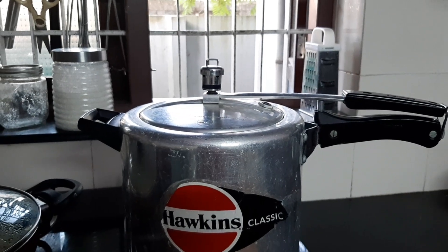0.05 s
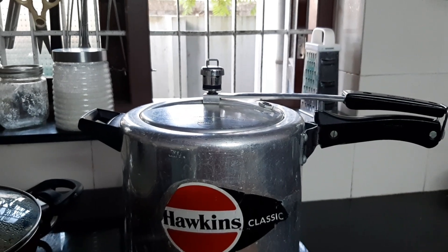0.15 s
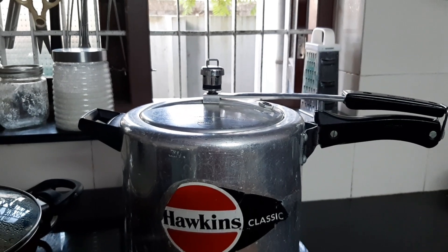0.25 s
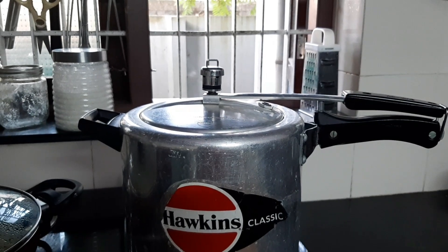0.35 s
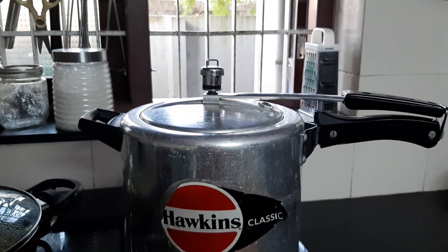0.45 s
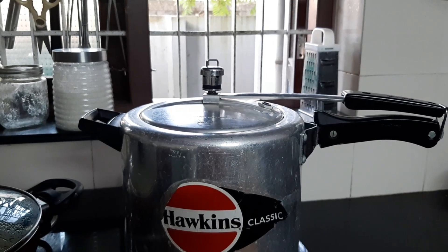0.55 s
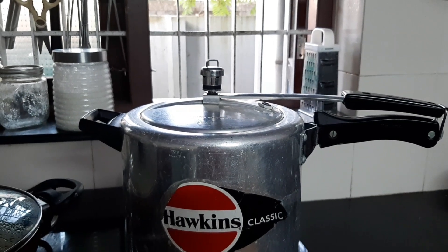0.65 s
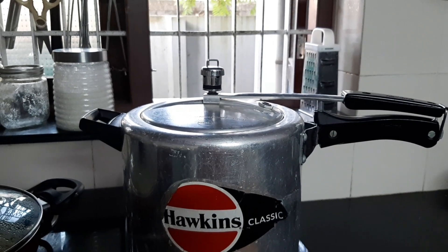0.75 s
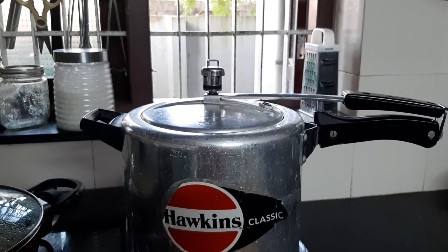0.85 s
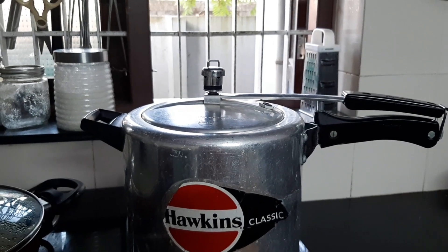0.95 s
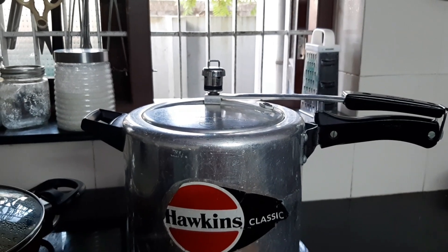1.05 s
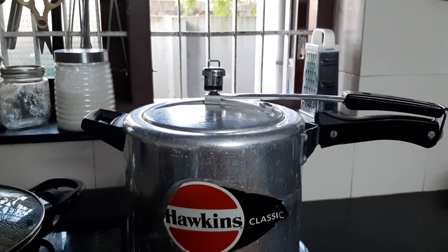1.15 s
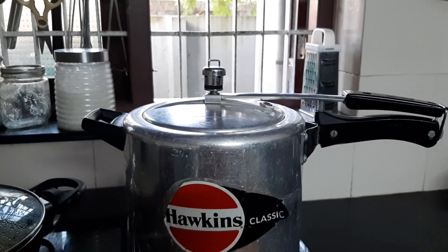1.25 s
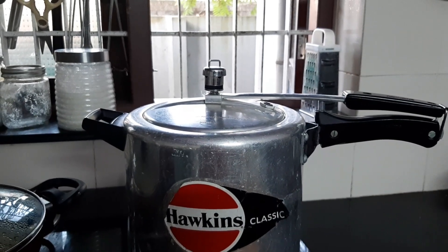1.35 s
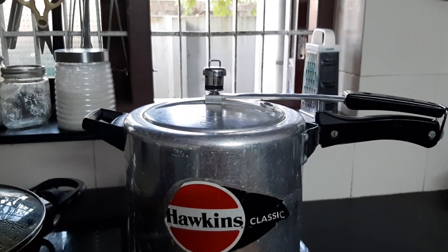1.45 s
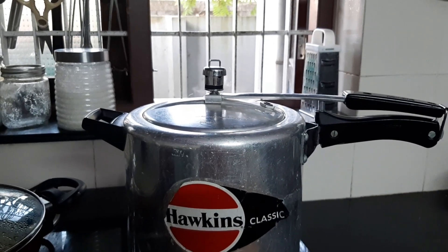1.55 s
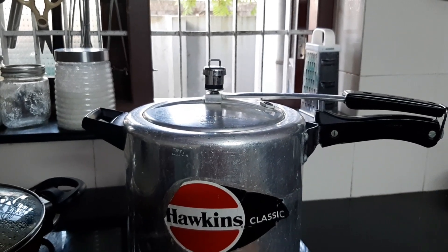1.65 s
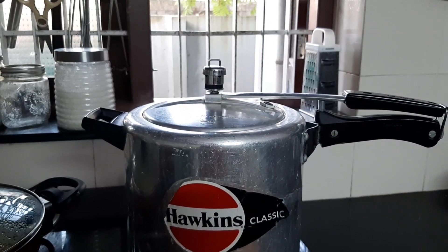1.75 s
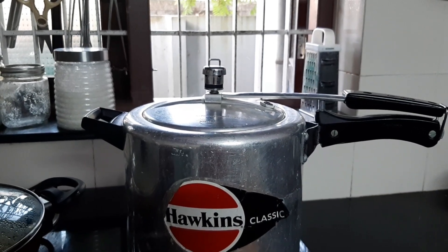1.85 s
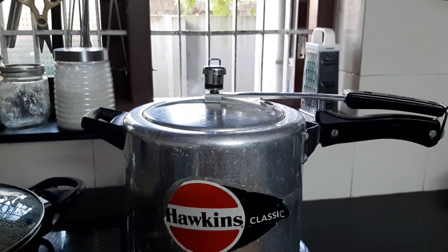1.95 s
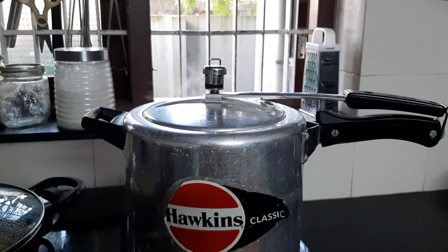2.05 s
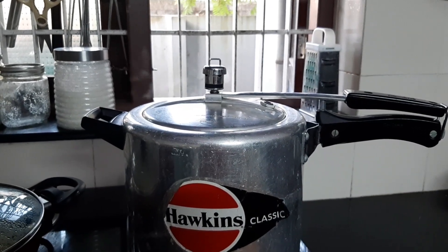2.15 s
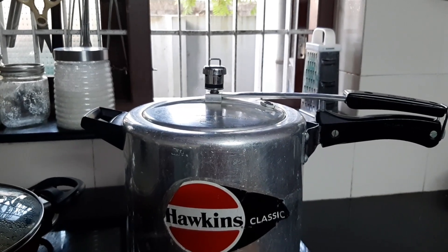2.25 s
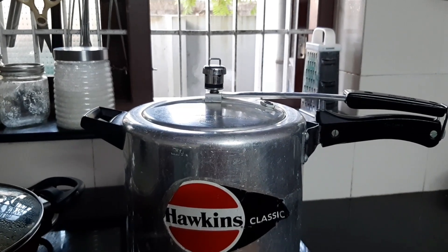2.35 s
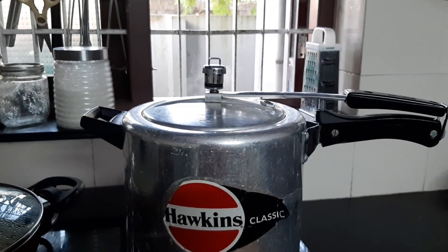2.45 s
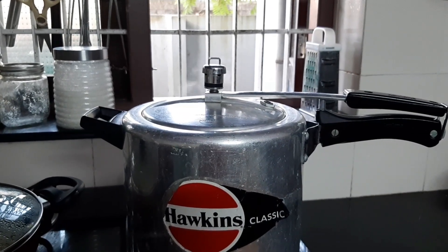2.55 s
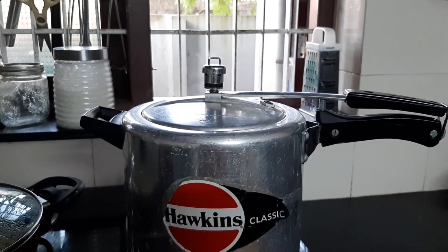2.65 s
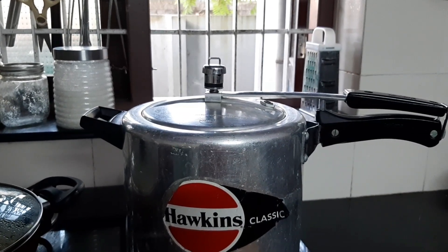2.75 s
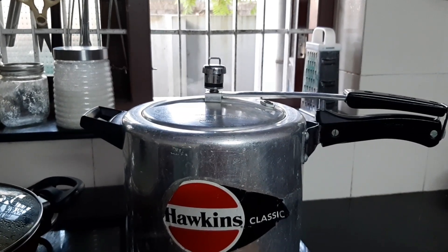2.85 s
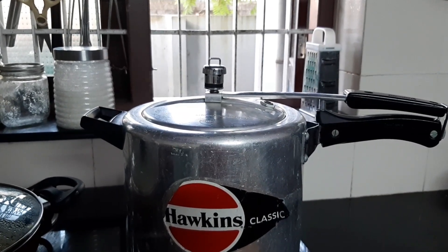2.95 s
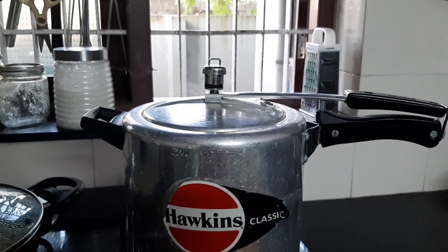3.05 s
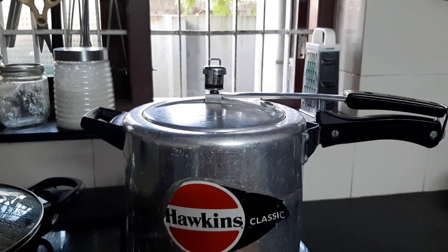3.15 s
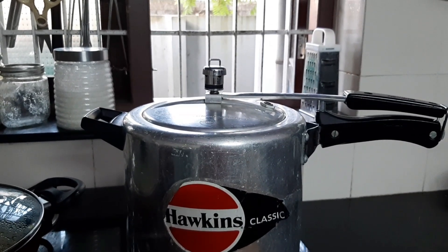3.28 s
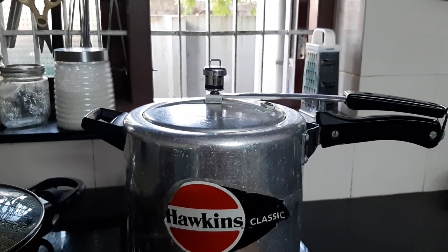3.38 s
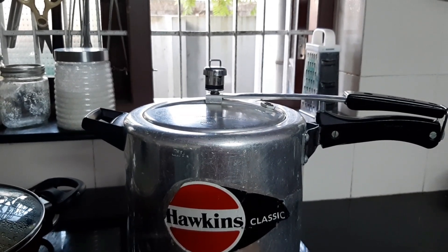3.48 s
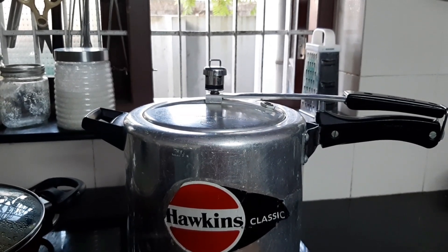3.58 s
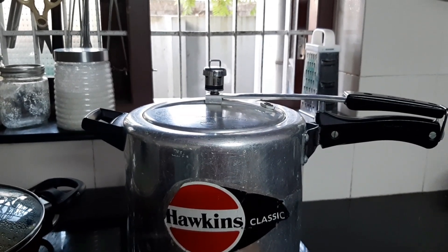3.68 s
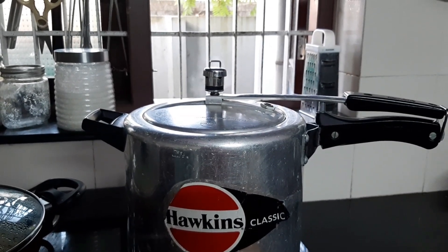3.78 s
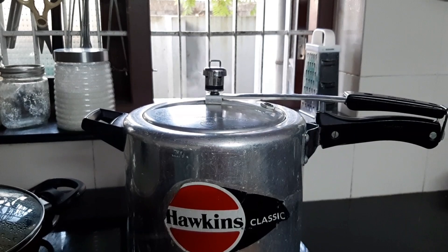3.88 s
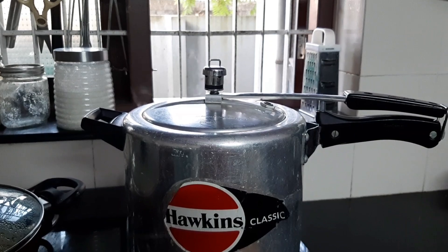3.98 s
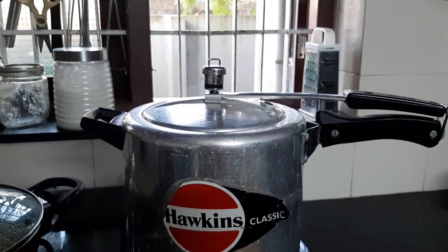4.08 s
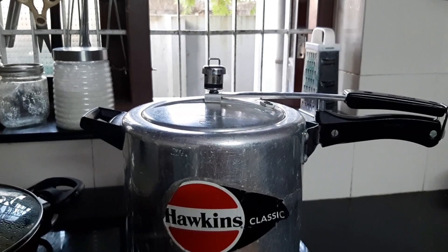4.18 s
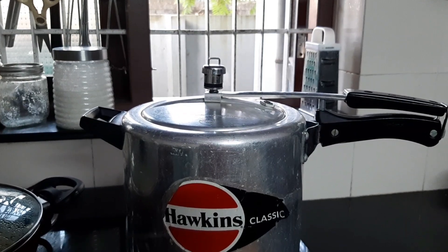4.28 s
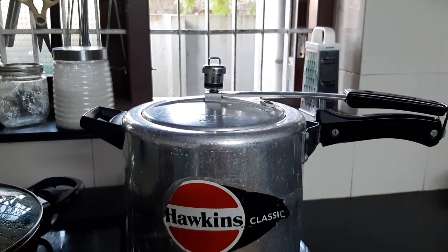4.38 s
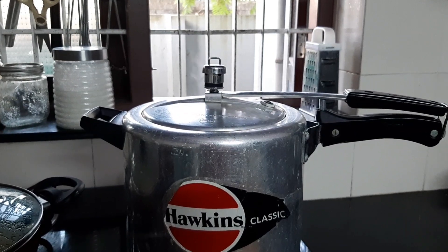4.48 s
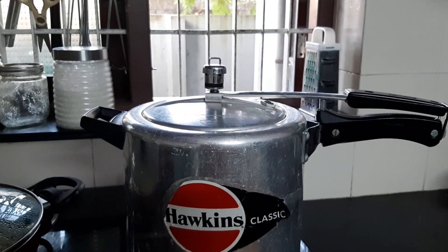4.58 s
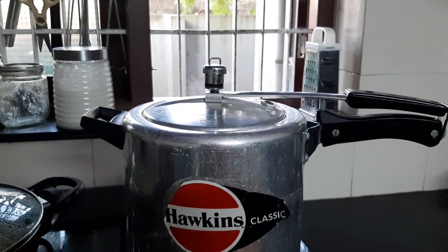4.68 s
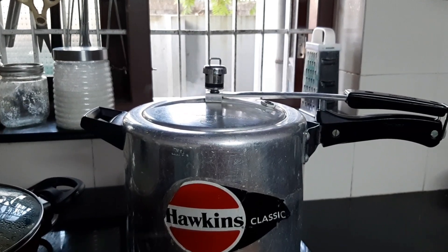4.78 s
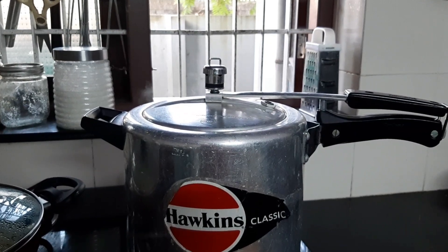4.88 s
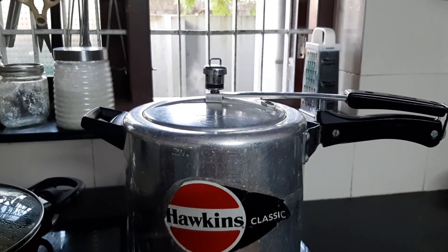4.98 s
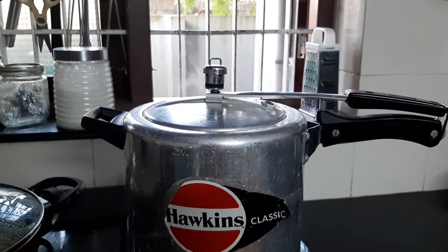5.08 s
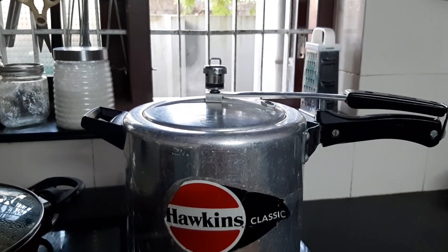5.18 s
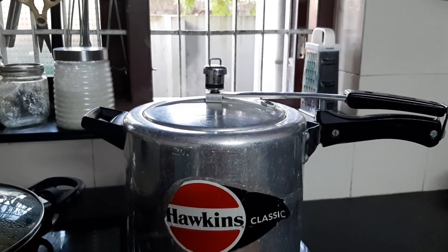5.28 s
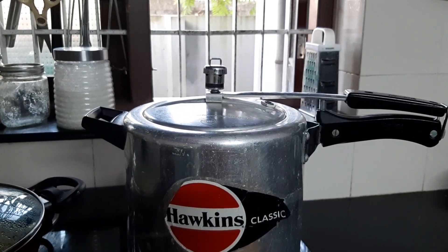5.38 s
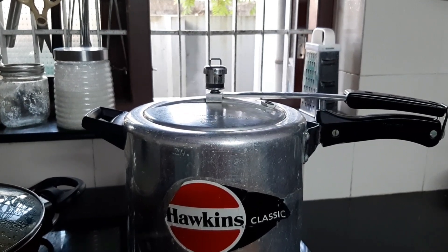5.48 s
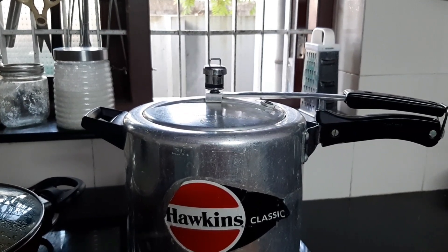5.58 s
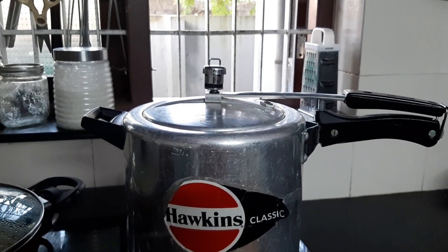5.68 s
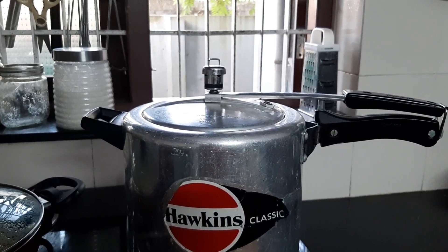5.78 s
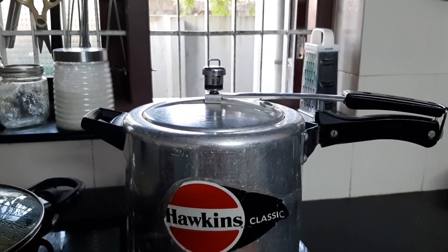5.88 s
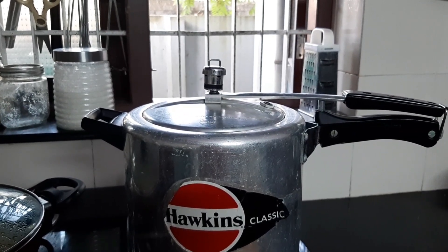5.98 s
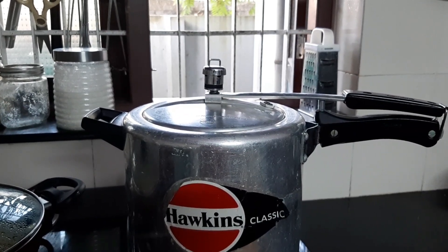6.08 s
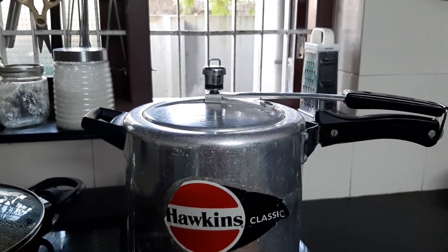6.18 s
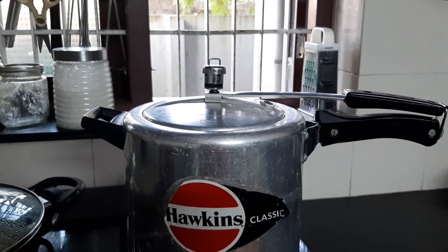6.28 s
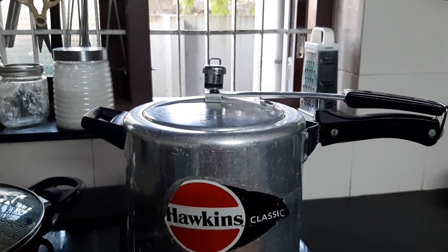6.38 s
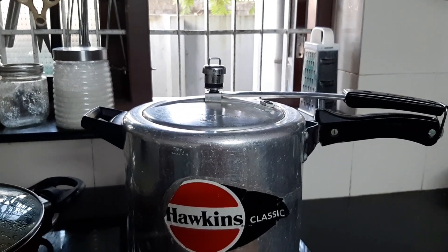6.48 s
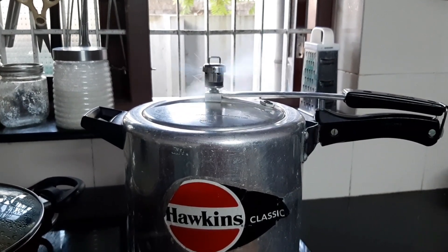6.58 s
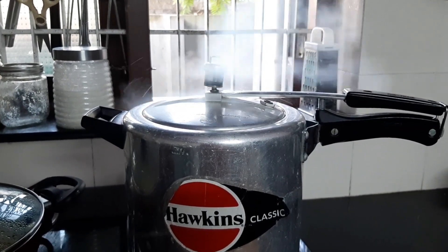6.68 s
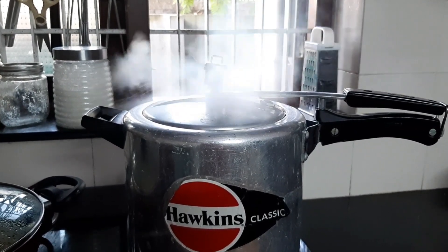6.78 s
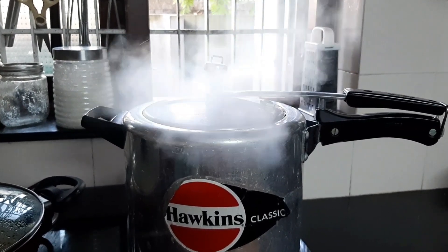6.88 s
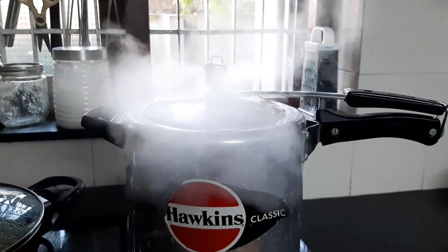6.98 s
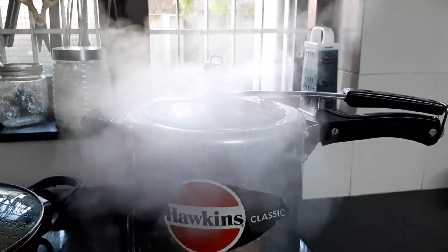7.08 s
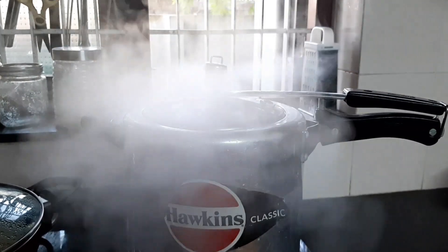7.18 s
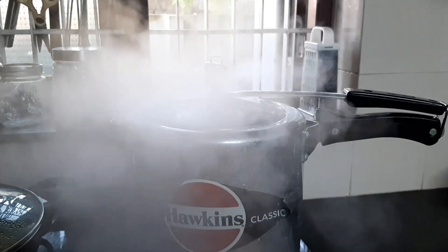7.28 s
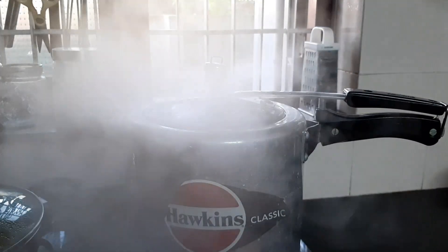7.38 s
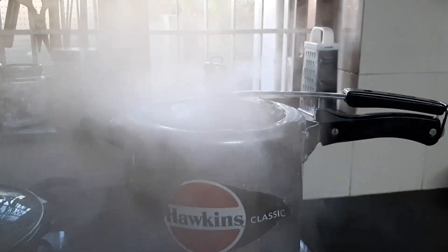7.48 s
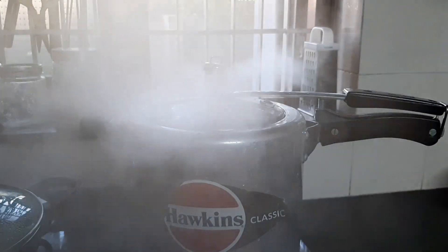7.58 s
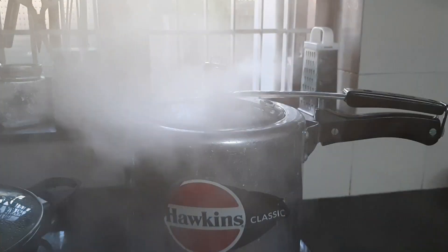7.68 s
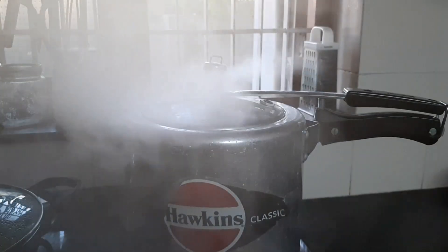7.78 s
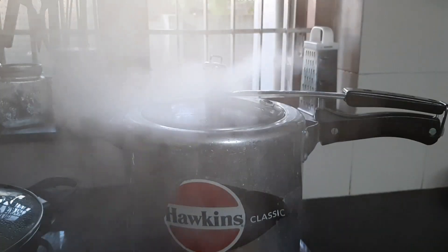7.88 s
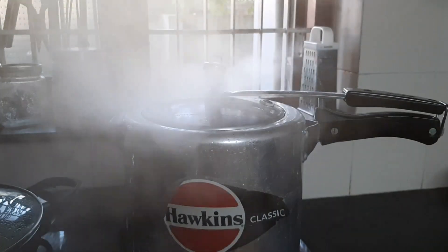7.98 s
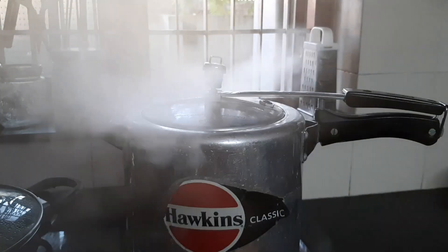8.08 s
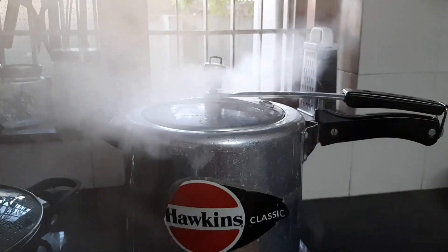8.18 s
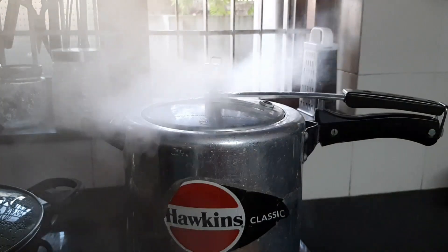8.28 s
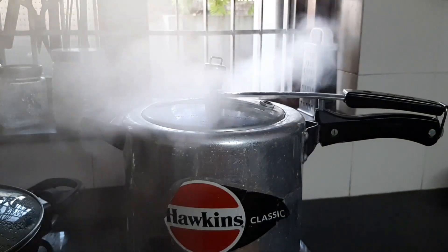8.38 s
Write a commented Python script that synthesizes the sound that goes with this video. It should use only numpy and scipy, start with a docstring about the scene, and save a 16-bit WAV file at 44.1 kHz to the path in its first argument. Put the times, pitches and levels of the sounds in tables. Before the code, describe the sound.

From 0 s, a pressure cooker simmers close to stereo microphones in a tiled kitchen: quiet lumpy boiling with small popping bubbles, a barely audible low hum and murmur of air, and a thin, bright seep of steam. Irregular soft puffs come and go, a dry metal tap lands near 1 s, and crisp wet spits snap at about 1.6 and 1.7 s, with weaker ones until 5 s. Between 2.5 and 4.7 s a bird outside gives faint, breathy falling whistles. From 4.4 s the puffs strengthen and pulse about three times a second, with a strong one and a tap at 5.9 s. A short strained lull follows, then at roughly 6.5 s steam bursts into a loud, broad, sharp hiss, with low buffeting thuds. It drowns the boiling, eases slightly around 7.2 to 8 s, then swells again and is still roaring at the end.

```python
"""A pressure cooker on a kitchen stove: steam leaks and spits under the weight, which rocks, then lifts into a full jet.
Steam is noise shaped by colour tables and driven by one flow curve; the weight's taps are short ringing clicks.
The jet buffets the microphones with low noise. Water boils as ringing noise and short rising bubble tones.
Something hums low over a murmur of air, and a bird sings outside in falling whistles. Tiled walls answer."""
import sys
import numpy as np
from scipy import signal
from scipy.fft import rfft, irfft, next_fast_len
from scipy.io import wavfile
from scipy.ndimage import uniform_filter1d, map_coordinates

SR = 44100
rng = np.random.default_rng(int(sys.argv[2]) if len(sys.argv) > 2 else 0)


def unload_audio(sound):
    """Save the sound as a 16-bit wav file, at the path given as the first command line argument."""
    columns = np.transpose(np.atleast_2d(sound))
    # keep every value between -1 and 1, then stretch to whole-number steps
    steps = np.round(np.clip(columns, -1, 1) * 32767)
    wavfile.write(sys.argv[1], SR, steps.astype(np.int16))


def ratio_of_db(decibels):
    """Turn decibels (scalar or array-like) into linear amplitude factors; 0 dB maps to 1."""
    return 10 ** (np.asarray(decibels, float) / 20)


N = 372204  # length in samples

# Levels in the tables are relative: the functions shift and mix them further.
# Colour of steam seeping under the weight: f/Hz, density/dB per Hz
LEAK_COLOUR = [(710, -27.5), (1200, -15.5), (1320, -23), (1440, -13.5), (1970, -20.5), (2360, -17),
               (2600, -13.5), (3220, -8.5), (3740, -7.5), (4350, -5), (6200, 1), (8550, -14), (9940, -13.5),
               (11800, -8), (15600, -15)]
# Colour of the leak just before the weight lifts: f/Hz, density/dB per Hz
STRAINED_COLOUR = [(710, -35), (1200, -17.5), (1310, -35), (1440, -15.5), (2280, -22.5), (2770, -11.5),
                   (5280, -6), (6830, -3), (9020, -15), (11700, -11), (15600, -16)]
# Colour of steam from the open vent: f/Hz, density/dB per Hz
JET_COLOUR = [(59, -41), (100, -28), (270, -23.5), (306, -22), (603, -19), (1160, -12.5), (1290, -17),
              (1430, -10), (2230, -12.5), (2760, -3), (3630, -2), (6700, -0.5), (8630, -6), (11900, 0.5),
              (15600, -8.5)]
# How much louder the leak is on the left: f/Hz, left minus right/dB
LEAK_LEAN = [(60, 1.5), (150, 2), (380, 0.5), (950, 0), (2380, 4), (5980, 4), (15000, -3)]
# The same for the strained leak and the jet: f/Hz, left minus right/dB
JET_LEAN = [(60, -1), (240, -2.5), (950, 0.5), (3770, 2), (15000, -1.5)]
# Steady steam past the weight, a seep until it lifts, then the jet: t/s, level of the hiss in the weight's cap/dB
STEADY_FLOW = [(0.0, -49), (1.0, -48.5), (2.0, -50), (3.0, -48), (4.0, -50.5), (5.0, -46), (5.8, -49),
               (6.385, -50.5), (6.44, -40), (6.59, -27), (6.72, -25), (6.83, -26), (7.03, -26.5),
               (7.2, -30), (7.7, -30.5), (7.95, -30.5), (8.1, -27.5), (8.25, -28.5), (8.44, -25.5)]
# The weight tilts and lets out a puff, irregularly at first, then rocking about three times a second:
# peak t/s, peak level/dB, rise/s, fall/s
WEIGHT_PUFFS = [(0.488, -46, 0.015, 0.018), (0.527, -46.5, 0.13, 0.058), (0.765, -44.4, 0.01, 0.05),
                (1.024, -44, 0.0076, 0.27), (1.464, -44, 0.086, 0.28), (1.783, -44.5, 0.116, 0.067),
                (2.017, -43.0, 0.01, 0.095), (2.085, -50, 0.015, 0.02), (2.18, -47, 0.02, 0.03),
                (2.288, -45.5, 0.13, 0.14), (2.529, -41.5, 0.04, 0.031), (2.733, -44.5, 0.19, 0.01),
                (2.84, -50, 0.11, 0.052), (3.061, -49, 0.01, 0.198), (3.238, -42.5, 0.074, 0.03),
                (3.38, -45.7, 0.069, 0.066), (3.525, -50, 0.02, 0.019), (3.631, -51.5, 0.18, 0.01),
                (3.69, -51, 0.02, 0.026), (3.793, -45, 0.11, 0.15), (3.99, -51, 0.02, 0.018),
                (4.117, -46.4, 0.13, 0.044), (4.446, -41, 0.059, 0.059), (4.771, -36.5, 0.065, 0.028),
                (4.97, -47, 0.016, 0.016), (5.076, -39.5, 0.029, 0.061), (5.29, -48, 0.08, 0.025),
                (5.407, -37.5, 0.052, 0.027), (5.61, -48, 0.03, 0.04), (5.714, -41.5, 0.07, 0.008),
                (5.908, -33, 0.051, 0.069), (6.295, -41.5, 0.2, 0.096), (6.585, -26, 0.015, 0.033),
                (6.935, -27, 0.015, 0.036), (8.42, -32, 0.02, 0.02)]
# The pot's pressure climbs to the lifting point between these times: start t/s, end t/s
PRESSURE_CLIMB = (5.59, 6.11)
# Drops of water blown out with the steam: t/s, peak level/dB, time to fall by 60 dB/s
WATER_SPITS = [(0.8949, -32, 0.043), (1.607, -12.5, 0.027), (1.734, -18.5, 0.025), (2.0033, -27, 0.04),
               (2.0344, -29, 0.037), (2.366, -23.5, 0.034), (2.6524, -22, 0.031), (2.8779, -25, 0.033),
               (3.1203, -26, 0.035), (3.8511, -28.5, 0.042), (4.9462, -29, 0.04), (5.0539, -28, 0.035)]
# The hollow of the weight sings along with the leak: f/Hz, width/Hz, level/dB
CAP_RESONANCES = [(6670, 170, -5.5), (11780, 140, -2.5)]
# The rocking weight taps its seat: t/s, level/dB
WEIGHT_TAPS = [(1.0342, -14), (2.0884, -25), (5.9035, -12)]
# Ringing of the damped weight: f/Hz, width/Hz, level/dB
WEIGHT_RESONANCES = [(1580, 280, -3), (3400, 1000, -5), (6200, 1500, 4)]
# Gusts of steam at the microphones: peak t/s, peak level/dB, fall/s
STEAM_GUSTS = [(6.65, -42, 0.037), (6.72, -48.5, .06), (6.83, -52, 0.11), (7.03, -57, .06),
               (7.52, -55, .06), (7.71, -58, .03), (8.0, -57, .08)]
# Surges of boiling: peak t/s, half length/s, rumble level/dB, bubbling level/dB
BOIL_SURGES = [(0.097, 0.06, -57, -59), (0.473, 0.045, -59, -60), (1.013, 0.061, -58.5, -58),
               (1.264, 0.061, -56.5, -56), (1.76, 0.28, -57.5, -59.5), (2.134, 0.13, -73, -57),
               (2.63, 0.097, -56.2, -55.5), (2.96, 0.056, -62, -61.3), (3.343, 0.16, -66, -57),
               (3.746, 0.27, -60.5, -62.5), (4.62, 0.23, -59.2, -58), (5.416, 0.086, -62, -59),
               (5.64, 0.06, -63, -60), (5.91, 0.077, -58.4, -55), (6.326, 0.32, -64, -60)]
# Ringing of the water and the pot's wall: f/Hz, width/Hz, level/dB
POT_RESONANCES = [(137, 37, -13), (204, 23, 0), (222.5, 19, 3), (268, 17, -0.5), (302.4, 15, 1),
                  (352, 32, -4.5), (420, 79, -12.5)]
# Colour of the rush of small bubbles: f/Hz, density/dB per Hz
BUBBLING_COLOUR = [(210, -5), (350, -3), (523, -3), (571, 0), (710, -2), (834, 4), (1320, -3), (1430, -6.5),
                   (2000, -14), (2600, -1), (4400, -120)]
# Likeness of left and right in the boil and the air, 1 = the same: f/Hz, likeness
LEFT_RIGHT_LIKENESS = [(60, 0.97), (130, 1), (290, 1), (640, 0.79), (1410, 0.18), (3100, 0.08),
                       (6820, 0.12), (15000, 0.1)]
# Strength of the low hum: t/s, level/dB
HUM_LEVEL = [(0.0, -94), (0.03, -75), (1.38, -69.5), (2.35, -68), (2.43, -81), (4.16, -69), (4.27, -85),
             (4.83, -72), (5.25, -81), (6.5, -75)]
# Colour of the kitchen's low murmur of air: f/Hz, density/dB per Hz
AIR_COLOUR = [(12, -41), (20, -25), (65, -7), (160, 3), (210, -22), (350, -120)]
# Bird notes: t/s, length/s, start f/Hz, level/dB, octave overtone over the note/dB
BIRD_NOTES = [(2.518, .14, 3335, -46, -20), (2.666, .063, 3345, -49, -20), (2.841, 0.11, 3150, -54, -20),
              (2.894, 0.1, 2430, -56, 7), (3.087, .16, 3130, -50, -20), (3.189, 0.14, 2230, -61, 14),
              (3.417, .095, 3400, -53, -20), (3.458, .14, 2400, -64, 14), (3.748, 0.11, 2490, -56, 9),
              (3.856, 0.091, 2270, -62, 15.5), (3.987, .2, 3380, -55, -20), (4.059, 0.16, 2320, -64.5, 17),
              (4.27, 0.18, 3400, -52, -20), (4.58, .17, 3220, -50, -20)]
# Echoes off surfaces near the vent: left delay/ms, right delay/ms, level/dB
NEAR_ECHOES = [(.7, 1.2, -51), (2.5, 2.1, -11.5), (4.74, 5.05, -6), (6.85, 5.4, -6), (8.15, 6.6, -12)]
# Fading of the sound between the walls: f/Hz, time to fall by 60 dB/s
WALL_FADING = [(300, 0.63), (3000, 0.33), (12000, 0.24)]
# Colour of the spot and the microphones: f/Hz, level/dB
MICROPHONE_COLOUR = [(28, -14), (55, -0.8), (800, 0.15), (1000, 0.1), (1600, -1), (1850, 1.5), (2080, 4.5),
                     (2400, 0), (7400, -0.35), (10500, -0.8), (11600, -0.2), (12300, -0.9), (13300, 3.5),
                     (14500, 2.5), (15700, 4.5)]
# How far the left microphone is ahead of the right: f/Hz, phase/rad
LEFT_AHEAD = [(300, 0.046), (1500, 0.39), (3000, 0.85), (6000, 1.37), (8000, 1.78), (11000, 5.23),
              (13000, 5.1), (15500, 7.2)]


def unit(x):
    """Scales a sound to an rms of 1."""
    return x / np.sqrt(np.mean(x ** 2) + 1e-20)


def along(points, hz):
    """Reads a (f/Hz, value) table at any frequency, on a log axis."""
    f, value = np.transpose(points)
    return np.interp(np.log(hz + 1), np.log(f + 1), value)


def curves(rows):
    """Turns each column after the time into one value per sample."""
    s, *columns = np.transpose(rows)
    return [np.interp(np.arange(N) / SR, s, column) for column in columns]


def wobble(rate):
    """A smooth random curve with rate new random values a second."""
    knots = rng.standard_normal(int(N * 200 / SR))
    return map_coordinates(knots, [np.arange(N) * rate / SR])


def swells(rows):
    """Summed power of bell-shaped swells: peak t/s, peak level/dB, rise/s, fall/s."""
    t = np.arange(N) / SR
    power = np.zeros(N)
    for s, db, rise, fall in rows:
        side_s = np.where(t < s, rise, fall)
        power += ratio_of_db(db) ** 2 * np.exp(-((t - s) / side_s) ** 2)
    return power


def filtered(x, response):
    """Multiplies the spectrum of x by a function of frequency."""
    size = next_fast_len(N + 8192)
    spectrum = rfft(x, size) * response(np.fft.rfftfreq(size, 1 / SR))
    return irfft(spectrum, size)[..., :N]


def resonances(modes):
    """Response of a few ringing modes, with alternating signs: f/Hz, width/Hz, level/dB."""
    def response(f):
        total = 0
        for k, (centre, width, db) in enumerate(modes):
            ring = 1j * f * width / (centre * centre - f * f + 1j * f * width)
            total = total + (-1) ** k * ratio_of_db(db) * ring
        return total
    return response


def patchy(patchy_db, channels):
    """White noise with patches of random gain over time and frequency, shared by all channels."""
    z = signal.stft(rng.standard_normal((channels, N)), nperseg=512)[2]
    field = uniform_filter1d(rng.standard_normal(z.shape[1:]), size=6, axis=0)
    field = uniform_filter1d(field, size=8, axis=1)
    return signal.istft(z * ratio_of_db(patchy_db * unit(field)), nperseg=512)[1][:, :N]


def band_rms(x, lo_hz, hi_hz):
    """Strength of one band in the mean of the channels."""
    return np.std(filtered(x.mean(axis=0), lambda hz: (hz > lo_hz) & (hz < hi_hz)))


def paired(two, alike):
    """Mixes two unrelated noises into a left and right of a given likeness."""
    def mid_side(hz):
        angle = np.arccos(np.clip(along(alike, hz), -1, 1)) / 2
        return np.array([np.cos(angle), np.sin(angle)])
    mid, side = filtered(two, mid_side)
    return np.array([mid + side, mid - side])


def kitchen(x, echo_db, tail_db):
    """One source reaches both microphones directly, off nearby surfaces and off the walls."""
    hz, t, z = signal.stft(rng.standard_normal((2, SR // 2)), SR, nperseg=256)
    fading = ratio_of_db(-60 * t / along(WALL_FADING, hz)[:, None])
    tail = signal.istft(z * fading, SR, nperseg=256)[1]
    tail = ratio_of_db(tail_db) * tail / np.linalg.norm(tail[0])
    path = np.pad(tail, ((0, 0), (300, 0)))  # the tail starts 300 samples late
    path[:, 0] = 1  # direct sound
    for left_ms, right_ms, db in NEAR_ECHOES:
        delays = [round(left_ms * SR / 1000), round(right_ms * SR / 1000)]
        path[[0, 1], delays] += ratio_of_db(db + echo_db)
    return signal.fftconvolve(x[None], path / np.linalg.norm(path[0]), axes=1)[:, :N]


def venting_db():
    """The weight lets out steam as a steady flow and puffs, added as power."""
    steady_db, = curves(STEADY_FLOW)
    return 10 * np.log10(ratio_of_db(steady_db) ** 2 + swells(WEIGHT_PUFFS))


def vent_opening(cap_db, pressure):
    """Stronger flow, helped by pressure, opens the vent wider: near 0 shut, near 1 open."""
    start_db, span_db, push_db = -32, 9, 5.5
    return np.clip((cap_db + push_db * pressure - start_db) / span_db, .001, .999)


def spits():
    """Power of drops of water blown out: a quick rise, then a steady decay in dB."""
    power = np.zeros(N)
    for s, db, t60 in WATER_SPITS:
        since = np.clip(np.arange(N) / SR - s, 0, 1)
        rise = np.clip(since / 0.0066, 0, 1)
        power += ratio_of_db(db - 4.5 - 60 * since / t60) ** 2 * rise
    return power


def steam_flow(cap_db, opening):
    """Flow flickers, less once the vent is open, and spits add to its power."""
    slow_db = 0.8 * wobble(25) + 0.43 * wobble(9)
    flicker_db = (1 - opening) * slow_db + 0.71 * wobble(90)
    return np.sqrt(ratio_of_db(cap_db + 2.5 + flicker_db) ** 2 + spits())


def hiss(spectrum, left, gain, spread, patchy_db, echo_db, tail_db):
    """Turbulent steam: the vent's part sounds through the room, the spread plume differs at each microphone."""
    noise = gain * patchy(patchy_db, channels=3)
    at_vent = kitchen(noise[0], echo_db, tail_db)
    both = np.sqrt(1 - spread) * at_vent + np.sqrt(spread) * noise[1:]

    def colour(hz):
        lean_db = np.outer([.5, -.5], along(left, hz))
        return ratio_of_db(along(spectrum, hz) + lean_db)

    # coloured white noise sets the reference for the band where the cap rings
    reference = filtered(rng.standard_normal((1, N)), lambda hz: ratio_of_db(along(spectrum, hz)))
    cap_level = band_rms(reference, 4800, 7600)
    return filtered(both, colour) / (cap_level * np.std(noise[0] / gain))


def steam():
    """Building pressure changes the leak's ring; stronger flow widens the vent until a broad jet takes over."""
    t = np.arange(N) / SR
    cap_db = venting_db()
    pressure = np.interp(t, PRESSURE_CLIMB, [.001, .999])
    opening = vent_opening(cap_db, pressure)
    flow = steam_flow(cap_db, opening)
    shut = flow * np.sqrt(1 - opening)
    leak = hiss(LEAK_COLOUR, LEAK_LEAN, shut * np.sqrt(1 - pressure),
                spread=0.33, patchy_db=1.5, echo_db=2.0, tail_db=-1.0)
    strain = hiss(STRAINED_COLOUR, JET_LEAN, shut * np.sqrt(pressure),
                  spread=0.5, patchy_db=1.5, echo_db=-5.0, tail_db=-2.0)
    jet = hiss(JET_COLOUR, JET_LEAN, flow * np.sqrt(opening),
               spread=0.57, patchy_db=1.25, echo_db=-11.5, tail_db=-2.5)
    seep = leak + strain
    sung = filtered(seep, lambda hz: 1 + abs(resonances(CAP_RESONANCES)(hz)))
    both = sung + jet

    # the thin top hiss grows less than the flow does
    top = filtered(both, lambda hz: np.clip((hz - 7800) / 1500, 0, 1))
    surge_db = np.maximum(cap_db + 30, 0)  # cap level above -30 dB
    seep_top_db = 1.6 - 0.29 * (20 * np.log10(flow) + 41.5)  # the usual seep is -41.5 dB
    jet_top_db = 2 - 0.67 * surge_db
    top_db = (1 - pressure) * seep_top_db + pressure * jet_top_db
    top_change = top * (ratio_of_db(top_db + 0.34 * wobble(20)) - 1)

    # a puff excites the cap more than the duller hiss beneath it
    dull = lambda hz: np.clip((5700 - hz) / 1300, 0, 1)
    lag_db = -.45 * (cap_db + 43.0)
    seep_change = filtered(seep, dull) * (ratio_of_db(lag_db) - 1)

    # spray mutes the jet's lower roar most at the lift, less before and after
    wet_db, lift_s, clear_s = 2.5, 6.54, .5
    spray_db = wet_db * np.exp(-abs(t - lift_s) / clear_s)
    body_db = 1.6 - .55 * surge_db - spray_db
    grown = np.clip(opening / .7, 0, 1) ** 1.1  # full roar at 0.7 of the opening
    roar_change = filtered(jet, dull) * (ratio_of_db(body_db) * grown - 1)
    return both + top_change + seep_change + roar_change


def ticks():
    """Short dry taps of metal on metal: single clicks ring the weight, stronger on the left."""
    blows = np.zeros(N)
    for s, db in WEIGHT_TAPS:
        blows[round(s * SR)] = ratio_of_db(db + 9.0)
    ringing = filtered(blows, resonances(WEIGHT_RESONANCES))
    return kitchen(ringing, echo_db=-6, tail_db=-8) * ratio_of_db([[1.5], [-1.5]])


def buffet():
    """Steam reaches the microphones and keeps swirling: low thuds, unrelated left and right."""
    from_s, fade_s, swirl_db, gust_rise_s = 6.62, .03, -60, 0.012
    arrived = np.clip((np.arange(N) / SR - from_s) / fade_s, 0, 1)
    gusts = swells([(s, db, gust_rise_s, fall) for s, db, fall in STEAM_GUSTS])
    swirl = arrived * ratio_of_db(swirl_db + 2.4 * wobble(14))
    level = np.sqrt(gusts + swirl ** 2)
    low_band = lambda hz: (hz / np.hypot(hz, 75)) ** 3 / (1 + (hz / 260) ** 2)
    low = filtered(rng.standard_normal((2, N)), low_band)
    flutter = ratio_of_db(1.9 * np.array([wobble(30), wobble(30)]))
    return level * flutter * unit(low)


def bubbles(count):
    """Vapour bubbles collapse on the pot's floor: short rising tones of a few cycles."""
    draw = rng.random((count, 3))  # pitch, size, moment
    hz = 750 * np.exp(1.26 * (draw[:, [0]] - .5))
    t = np.arange(1200) / SR
    cycles = hz * t
    envelope = np.exp(-cycles / 2.2) * (1 - np.exp(-cycles / 0.93))
    tone = np.sin(2 * np.pi * cycles * (1 + 0.011 * cycles)) * envelope
    size = ratio_of_db(-2.5 * np.log(0.028 + draw[:, [1]]))
    at = (draw[:, [2]] * N).astype(int) + np.arange(len(t))
    return unit(np.bincount(at.ravel(), (size * tone).ravel())[:N])


def boil():
    """Lumpy rumble rings the pot, and bubbles pop on a rush of smaller ones; both swell with each surge."""
    simmer_rumble_db, simmer_bubble_db = -64, -62  # between surges
    rumble_swells = swells([(s, db, half, half) for s, half, db, _ in BOIL_SURGES])
    bubble_swells = swells([(s, db, half, half) for s, half, _, db in BOIL_SURGES])
    rumble_gain = np.sqrt(ratio_of_db(simmer_rumble_db) ** 2 + rumble_swells)
    bubble_gain = np.sqrt(ratio_of_db(simmer_bubble_db) ** 2 + bubble_swells)
    lumps = ratio_of_db(1.6 * wobble(18)) * rng.standard_normal((2, N))
    rumble = unit(paired(filtered(lumps, resonances(POT_RESONANCES)), LEFT_RIGHT_LIKENESS))
    rush = unit(filtered(patchy(3.3, channels=2), lambda hz: ratio_of_db(along(BUBBLING_COLOUR, hz))))
    pops = kitchen(bubbles(count=600), echo_db=-17, tail_db=-6.5)
    bubbling = unit(paired(rush, LEFT_RIGHT_LIKENESS) + 0.36 * pops)
    return ratio_of_db(0.3) * rumble_gain * rumble + ratio_of_db(3.0 + 1.2 * wobble(10.5)) * bubble_gain * bubbling


def hum():
    """A low sine hum wavers in pitch and level, over a murmur of air made of low noise."""
    level_db, = curves(HUM_LEVEL)
    pitch_hz = 69 + 1.53 * wobble(4)
    level = ratio_of_db(level_db + 2.5 + 1.6 * wobble(6.4))
    tone = level * np.sin(2 * np.pi * np.cumsum(pitch_hz) / SR)
    air = filtered(rng.standard_normal((2, N)), lambda hz: ratio_of_db(along(AIR_COLOUR, hz)))
    murmur = ratio_of_db(-71.0) * unit(paired(air, LEFT_RIGHT_LIKENESS))
    return tone * ratio_of_db([[.7], [-.7]]) + murmur  # the tone is stronger on the left


def quiet_under_jet():
    """Gain that lets the softer sounds sink away while the jet roars."""
    return ratio_of_db(np.interp(np.arange(N) / SR, [6.56, 6.66], [0, -19]))


def bird():
    """Falling, breathy whistles with an octave overtone, blurred by the yard and the window."""
    sag_per_s = .27  # share of its starting pitch that a note falls each second
    song = np.zeros(N)
    flutter, breath = wobble(90), wobble(150)
    for s, length, start_hz, db, octave_db in BIRD_NOTES:
        u = np.linspace(0, 1, round(length * SR))
        at = slice(round(s * SR), round(s * SR) + len(u))
        pitch_hz = start_hz * (1 - sag_per_s * length * u) + 75 * flutter[at]
        phase = 2 * np.pi * np.cumsum(pitch_hz) / SR
        swell = np.sqrt(np.sin(np.pi * u).clip(0))  # held level, soft at both ends
        whistle = np.sin(phase) + ratio_of_db(octave_db) * np.sin(2 * phase)
        song[at] += ratio_of_db(db) * swell * (1 + 0.61 * breath[at]) * whistle
    return 0.41 * song + 1.12 * kitchen(song, echo_db=-8.0, tail_db=4)


def scene():
    """Adds all sources at the two microphones."""
    softer = quiet_under_jet() * (boil() + hum())
    return steam() + ticks() + buffet() + softer + bird()


def roll_off(x):
    """The treble ends steeply here."""
    return signal.sosfilt(signal.butter(12, 16850, fs=SR, output="sos"), x)


def record(dry):
    """Two microphones a little apart, the left one nearer, colour the sound and cut it off at the top."""
    top_hz = 15730

    def response(hz):
        lead = np.exp(1j * np.outer([.5, -.5], along(LEFT_AHEAD, hz)))
        return ratio_of_db(along(MICROPHONE_COLOUR, hz)) * lead * (hz < top_hz)

    heard = filtered(dry, response)
    return roll_off(heard)


dry = scene()
out = record(dry)
unload_audio(out)
```